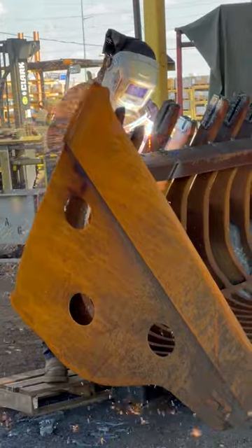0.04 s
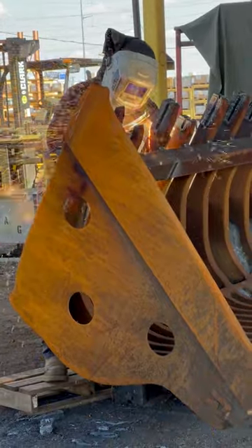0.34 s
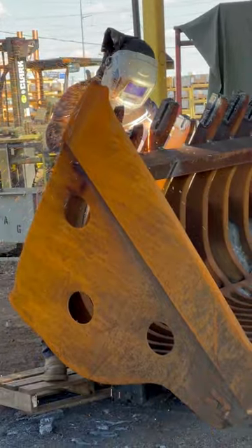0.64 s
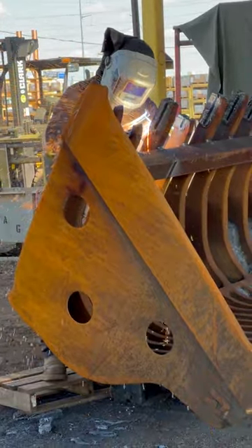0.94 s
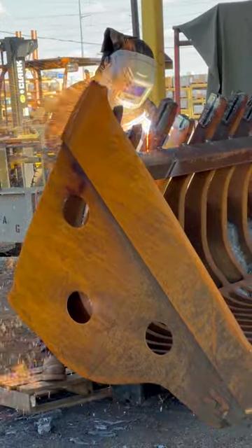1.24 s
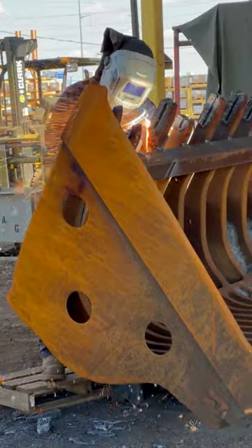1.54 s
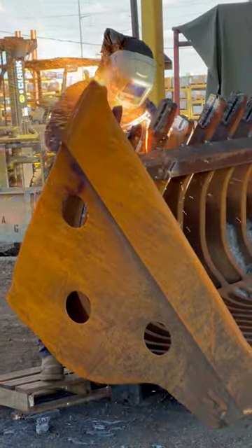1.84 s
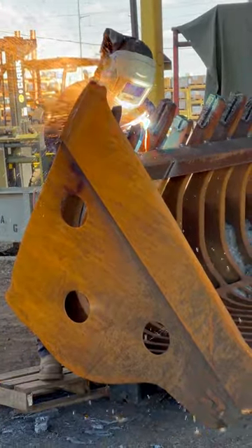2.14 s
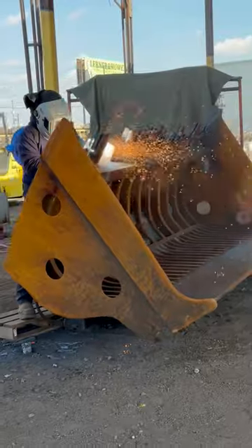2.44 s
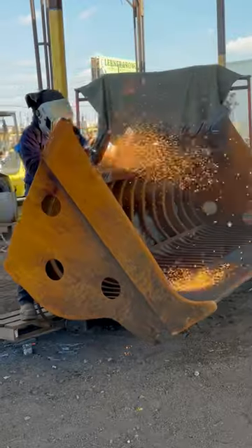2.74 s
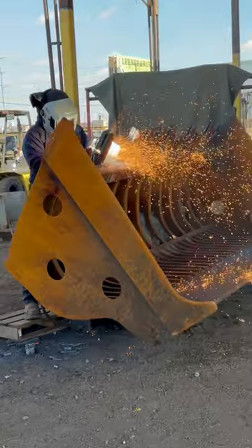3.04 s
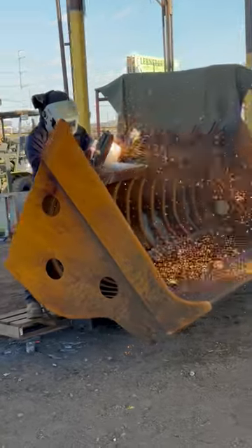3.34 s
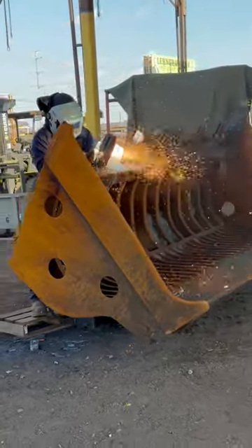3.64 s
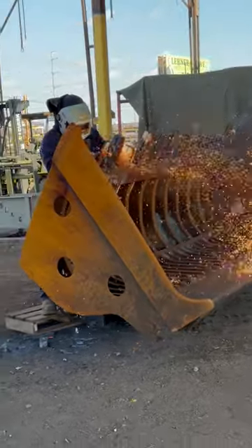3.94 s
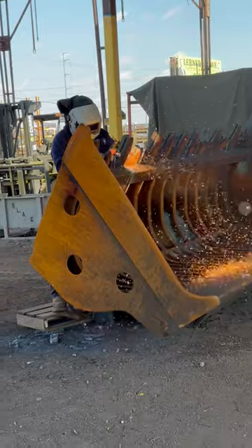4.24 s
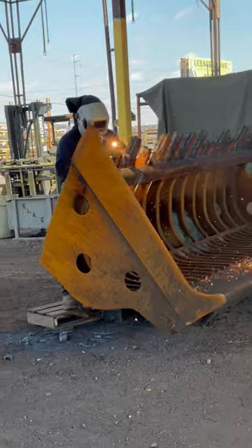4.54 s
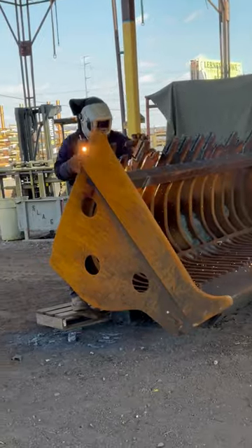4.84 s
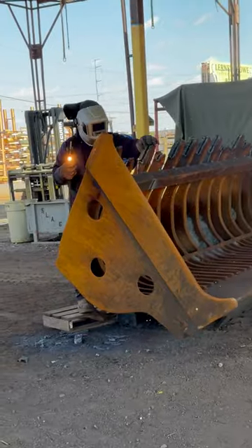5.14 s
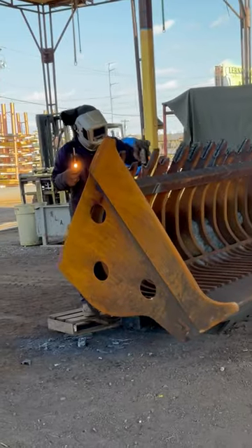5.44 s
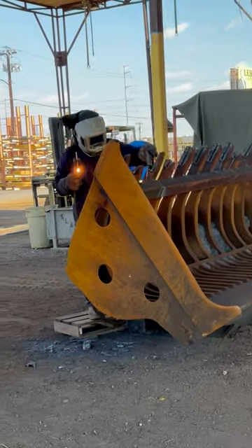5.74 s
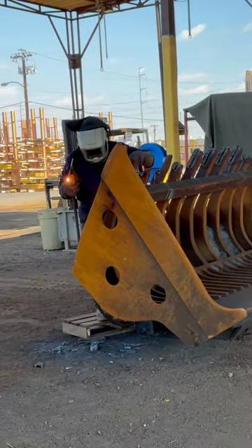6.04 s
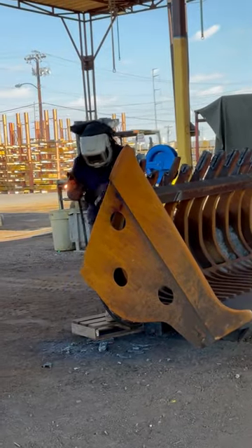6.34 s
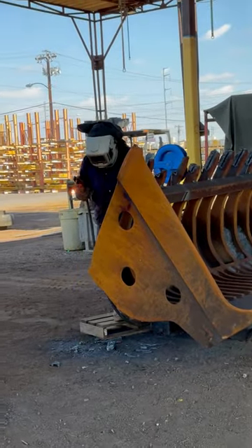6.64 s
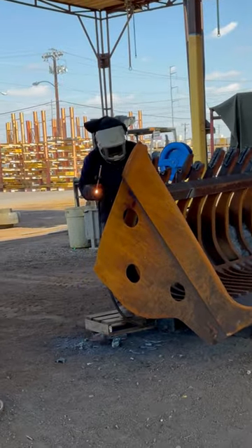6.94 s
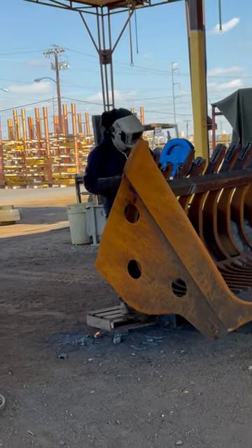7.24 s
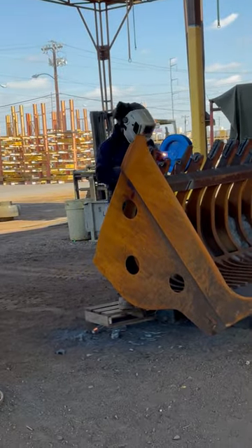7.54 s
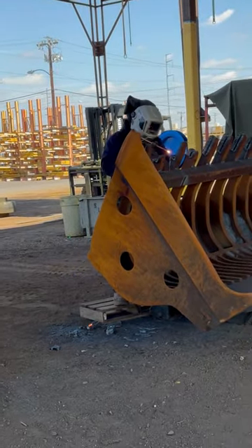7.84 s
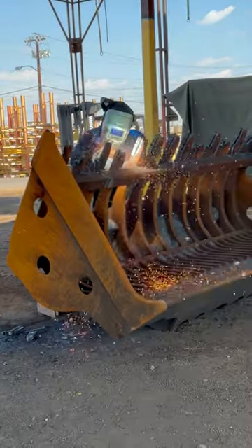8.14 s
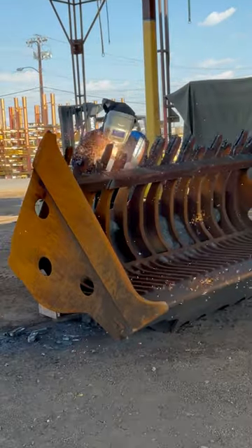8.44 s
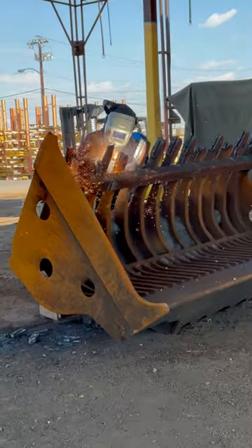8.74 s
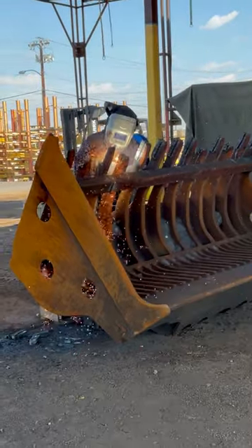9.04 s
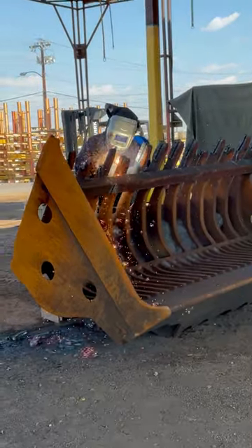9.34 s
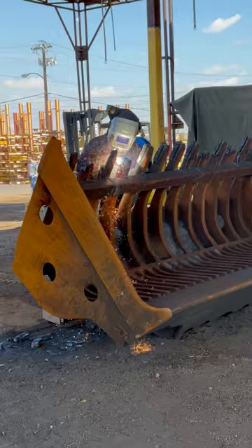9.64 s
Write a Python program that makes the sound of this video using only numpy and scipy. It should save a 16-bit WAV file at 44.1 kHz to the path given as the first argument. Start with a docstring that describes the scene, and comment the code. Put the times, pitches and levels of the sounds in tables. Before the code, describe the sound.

Stop-and-go sizzling and cracking of an arc torch on a steel bucket, a pause of hissing air, then a steadier burn.

```python
"""Air-arc gouging on a steel excavator bucket, a few metres off, under an open workshop roof.
The arc roars, sizzles and cracks, ringing the bucket's hollows and ribs; compressed air blows the melt
out in puffs. The arc sputters out near 4 s, the jet hisses and rushes over the steel while the torch
is moved, and the arc strikes again at 8 s. An engine drones in the yard."""
import sys
import numpy as np
from scipy import signal
from scipy.fft import rfft, irfft, next_fast_len
from scipy.io import wavfile
from scipy.ndimage import uniform_filter1d, map_coordinates

SR = 44100
rng = np.random.default_rng(int(sys.argv[2]) if len(sys.argv) > 2 else 0)


def store_pcm(level_fs):
    """Save levels as 16-bit WAV."""
    pcm = np.round(np.clip(level_fs, -1, 1) * 32767).astype(np.int16)
    wavfile.write(sys.argv[1], SR, np.atleast_2d(pcm).T)


N = 427769
TIME_S = np.arange(N) / SR
CHANGE_S, RESTRIKE_S = 2.33, 8.0  # sound abruptly changes colour and widens; last pass starts

# Stop-and-go burns: t/s, length/s, relative roar/dB, swell/dB, gurgle/dB re roar, sizzle/dB re roar
ARC_BURNS = [(-0.021, 0.22, -23, 1, -9.5, -5.0), (0.221, 0.069, -24.5, 3, -9, -3.5),
             (0.312, 0.027, -25, 2, -7, -1), (0.446, 0.2, -26.5, -3, -13, -2.5),
             (0.672, 0.13, -36, -6, -15.5, 1), (0.842, 0.079, -31, -4, -13, -1.5),
             (0.917, 0.29, -23, 0, -12.5, -5), (1.228, 0.065, -25.0, 2, -7, -2.0),
             (1.328, 0.18, -26, -1.5, -7.5, 0.5), (1.583, 0.05, -31, 0.5, -5.5, 2),
             (1.659, 0.36, -45.5, -0.5, -19, 14), (2.043, 0.08, -39, 4.5, -5, 9.5),
             (2.112, 0.2, -28.0, 2, -6.5, 0.5), (2.3, 0.31, -23, 2.5, -11.5, -2),
             (2.674, 0.054, -27, 4, -10.5, 0), (2.824, 0.069, -29, 9.5, -18, -2.0),
             (2.944, 0.14, -26.5, 6.5, -12, -3.5), (3.076, 0.2, -22, 1, -11.5, -6),
             (3.344, 0.21, -23.5, 2.5, -15.5, -3), (3.566, 0.13, -28.5, -0.5, -11, -4.5),
             (3.781, 0.032, -29, 3.5, -8.5, -7), (3.994, 0.028, -31.5, 1, -5, -2)]
# Hot groove between burns, relative: gurgle/dB, roar/dB, sizzle/dB
GROOVE_SMOULDER = (-47.5, -38, -42.5)
# Unbroken last burn, relative: t/s, gurgle/dB, roar/dB, sizzle/dB
LAST_BURN = [(8.02, -33.5, -26, -28.5), (8.15, -32.5, -26, -29), (8.254, -29.5, -20, -27),
             (8.348, -31.5, -25.5, -28.5), (8.488, -31, -20, -24.5), (8.64, -33.5, -21.5, -26),
             (8.735, -35, -20, -24), (8.844, -37, -23.5, -26), (8.886, -37, -25, -28),
             (8.922, -34, -24, -26), (9.002, -39.5, -27.5, -28), (9.038, -36, -22, -26.5),
             (9.2, -43, -33.5, -30), (9.3, -41, -31, -29.5), (9.38, -40, -27, -28), (9.59, -40.5, -26, -29),
             (9.64, -41.5, -26, -26.5)]
# Arc unsteadiness: t/s, crackle/dB re smooth roar
ARC_SPUTTER = [(0, -19), (2.2, -4.5), (2.75, 1.5), (3.1, -12.5), (3.55, 0.5), (4.1, -19), (8.5, -9),
               (9.2, -14)]
# Arc spectrum per stretch (before CHANGE_S, until the arc goes out, last burn): f/Hz, relative density/dB
STRETCH_1_SPECTRUM = [(80, -25), (150, -12.5), (200, -11.5), (400, -7.5), (520, -5), (750, -10.5), (1400, -4),
                      (2000, -2.5), (3200, -2), (3700, -2.5), (7000, 2), (9000, -3), (11000, -20),
                      (15500, -11)]
STRETCH_2_SPECTRUM = [(80, -27), (150, -3.5), (220, -13.5), (320, -8), (470, -2), (620, -10), (900, -4.5),
                      (1500, -1.5), (2700, -0.5), (5800, -1), (6600, 2.5), (9000, -4), (12500, -27),
                      (15500, -14.5)]
STRETCH_3_SPECTRUM = [(50, -33), (140, -2.5), (220, -11), (400, -3), (650, -8), (1200, -1.5), (1700, -1),
                      (2200, 1.5), (4000, -1), (7000, -1.5), (9000, -3.5), (11000, -22), (12500, -18),
                      (15500, -15)]
# Hollows between lip, teeth and ribs, per stretch: f/Hz, width/Hz, nominal boost/dB
STRETCH_1_HOLLOWS = [(495, 94, 3), (960, 46, 3.5), (1410, 170, 5), (1600, 42, 2), (1960, 64, 5.5),
                     (2540, 60, 5.5), (2796, 75, 5), (3060, 280, 4), (4520, 120, -3), (5360, 340, 3)]
STRETCH_2_HOLLOWS = [(363, 40, 2), (725, 130, 3.9), (1100, 65, 2.8), (1433, 82, 3.3), (1560, 150, 3.2),
                     (2210, 190, 1.4), (2360, 59, 1.9), (2460, 28, 3.2), (2750, 95, 3.8), (3260, 63, 1.5)]
STRETCH_3_HOLLOWS = [(786, 25, 8.3), (1168, 114, 8.9), (1370, 92, 3.5), (1644, 250, 6.8), (1750, 82, 1.9),
                     (2090, 19, 3.5), (2490, 81, 4.6), (2720, 100, 7.6), (3540, 340, 3.4), (4200, 79, 2.5),
                     (5100, 230, 2.9)]
# Torch depth in the hollows: t/s, factor on boost
HOLLOW_DEPTH = [(4.3, 1), (8.05, 1.35), (8.45, 0.99), (8.8, 1.05), (9.3, 0.72)]
# Bursting droplets: f/Hz, relative density/dB
SPATTER_SPECTRUM = [(4000, -38), (7000, -18), (8600, 7.5), (11000, 8.5), (12500, 6), (15500, -17)]
# Arc cracks: t/s, relative level/dB
ARC_CRACKS = [(0.9834, -7), (1.092, -10), (1.2973, -9), (2.3672, -10), (2.579, -7), (2.7189, -10),
              (2.732, -12), (2.885, -7), (3.088, -6), (3.474, -4), (3.498, -9), (3.512, -17), (3.523, -11),
              (3.533, -8), (3.543, -12), (3.561, -3), (3.566, -2), (3.689, -1), (3.692, -3), (3.8008, -5),
              (3.809, -11), (3.814, -9), (4.0189, -4), (4.0203, -5), (4.0228, -6.5), (4.0363, -11),
              (4.041, -12), (4.052, -14), (4.056, -17)]
# Resonances among the ribs: f/Hz, width/Hz, relative level/dB
RIB_MODES = [(1486, 39, -3), (1880, 95, -10), (2450, 52, -5), (3260, 36, -6), (3490, 57, -1),
             (4180, 31, -2), (4350, 51, -16), (5420, 51, -9), (5820, 31, -11), (6700, 39, -15),
             (6650, 64, -11)]
# Melt blown from the groove: t/s, relative level/dB, Gaussian sigma/s, f/Hz
MELT_PUFFS = [(0.108, -36, 0.014, 520), (.195, -33, .009, 510), (0.289, -32, 0.0072, 503),
              (0.353, -34, 0.011, 880), (0.57, -34, 0.015, 523), (0.649, -36.5, .015, 554),
              (.89, -37, 0.013, 520), (.96, -36.5, 0.013, 510), (1.019, -33, .01, 520),
              (1.199, -35.5, 0.0067, 474), (1.269, -34, .008, 400), (1.298, -30, 0.0082, 523),
              (1.415, -34, 0.0091, 550), (1.458, -33, 0.011, 477), (1.634, -33, 0.0078, 905),
              (2.016, -41, 0.0069, 520), (2.611, -33, .006, 380), (2.742, -30.5, 0.0079, 444),
              (2.903, -34, 0.011, 443), (3.477, -30.5, .005, 450), (3.512, -29.5, .004, 400),
              (3.53, -32, .004, 340), (3.816, -34, 0.007, 455), (4.025, -29.5, 0.003, 350),
              (4.038, -31, 0.0027, 1400), (4.05, -40, .005, 300)]

# Jet, louder as the nozzle faces the listener: t/s, hiss/dB, fizz/dB
NOZZLE_LEVELS = [(4.2, -44, -38), (4.44, -41.5, -35.5), (4.62, -42.5, -43), (4.9, -41.5, -38.5),
                 (5.0, -38.5, -35), (5.7, -37.5, -35), (6.1, -40, -35.5), (6.74, -40, -37),
                 (7.06, -38.5, -34.5), (7.3, -43, -43), (7.6, -42.5, -38), (7.98, -42, -34.5),
                 (9.3, -43, -53)]
# Jet fizz, free hiss, rush on steel, pocket between the teeth: f/Hz, relative density/dB
FIZZ_SPECTRUM = [(4000, -43), (6500, -4), (7600, -9.5), (8700, 6), (9300, 5), (10800, 8), (12000, 1),
                 (13000, -1.5), (14500, 2), (15500, 2.5)]
HISS_SPECTRUM = [(300, -20), (1200, -15), (2400, -9.5), (3200, -4.5), (5400, -3), (6650, 2), (7400, 1.5),
                 (8250, -8), (8600, -36), (9500, -53), (15000, -26)]
RUSH_SPECTRUM = [(100, -10), (240, -3.5), (400, 0.5), (640, 2), (810, -2), (930, 4.5), (1150, -0.5),
                 (1450, 2), (1650, 1), (2000, 1.5), (3000, 0), (6000, -17), (12000, -35)]
POCKET_SPECTRUM = [(150, -12), (340, -4), (570, 1), (720, -3.5), (830, 2), (950, -8), (1220, 0),
                   (1500, -0.5), (1740, 2.5), (2100, -4), (3000, -3), (6000, -20), (12000, -35)]
# Jet echo off the side plate: t/s, delay/ms, gain
SIDE_ECHO = [(4.1, 1, 0.15), (5.3, 1.8, 0.11), (5.9, 2.03, 0.45), (6.4, 1.75, 0.42), (7, 1.77, 0.62),
             (7.25, 1.8, .15), (8, 1, 0.11)]
# Jet drifting off the steel, then back into the pocket: t/s, relative level/dB
RUSH_LEVEL = [(4.15, -43), (4.42, -48), (4.78, -44), (5.32, -60.5), (6.13, -52.5), (6.68, -60)]
POCKET_LEVEL = [(6.712, -40.5), (6.8, -40), (6.85, -42), (7.0, -42.5), (7.22, -52), (7.38, -46),
                (7.582, -50.5), (7.786, -64), (7.98, -49)]
# Pocket resonance: start f/Hz, end f/Hz, time constant/s, width/Hz
POCKET_GLIDE = (1400, 860, 0.11, 560)
# Brief whistle in the hiss: t/s, level/dB, signed Gaussian sigma/s, f/Hz, width/Hz
HISS_WHISTLE = (6.975, -47.5, -0.1, 6270, 130)

# Echoes inside the bucket: delay/ms, gain
PLATE_ECHOES = [(.8, -0.074), (2.1, 0.038), (2.8, -0.0002), (3.85, 0.13), (5.6, 0.15), (7.3, 0.21),
                (11, 0.15), (16, 0.12), (23, 0.28)]
# Roof decay: f/Hz, T60/s
ROOF_T60 = [(200, 0.11), (2000, 0.58), (10000, 0.032)]
# Engine and yard: t/s, relative level/dB
ENGINE_LEVEL = [(0.0, -47), (0.08, -45.5), (1.73, -48.5), (2.27, -51.5), (2.32, -42), (4.27, -45.5),
                (7.73, -42.5), (8.24, -37), (9.4, -44), (9.7, -43)]
# Engine tones: f/Hz, relative level/dB
ENGINE_TONES = [(60, 1.5), (90, -7), (120, -7.5), (156, -8.5)]
# Yard rumble: f/Hz, relative density/dB
YARD_SPECTRUM = [(20, -30), (35, -9), (46, 1), (60, -3), (80, 2), (150, -8), (220, -8.5), (500, -21),
                 (2000, -17.5), (10000, -28)]
# Stereo width: f/Hz, side gain/dB
SIDE_GAIN = [(40, -30), (70, -39), (150, -19), (300, -14.5), (600, -7.5), (1000, -8.5), (1500, -12),
             (2100, -60), (3500, -59), (5700, -20), (7200, -38), (8400, -82), (9100, -2), (15000, -1)]
# Balance: f/Hz, left minus right/dB
BALANCE = [(350, 0), (580, 1.6), (850, .4), (1150, 1.4), (1600, 0)]
# Phase twist, channels opposed near 5 kHz, after CHANGE_S near 8 kHz: f/Hz, left minus right/rad
PHASE_EARLY = [(4500, 0), (4880, -1), (5030, -5.2), (5250, -6.28), (6300, -6.28), (7600, -7.1),
               (10000, -6.28)]
PHASE_LATE = [(2200, 0), (2800, .62), (4000, .7), (5000, .4), (5300, 0), (6300, 0), (7000, .7), (7500, 1.6),
              (7950, 3.05), (8450, 3.25), (8850, 5.9), (9500, 6.28)]


def arc(flutter_db=1.0):
    """Turbulent hot air plus crackling discharges, fluttering with the gap; heard in three stretches, the first
    two parted by an abrupt change of colour at CHANGE_S."""
    crackle = amp(curves(ARC_SPUTTER)[0])
    flow = (noise() + crackle * sparks(rate_hz=1100, spread_db=2)) / np.hypot(1, crackle)
    flow = bucket(flow * amp(flutter_db * wobble(45)))
    broken, unbroken = burns(), amp(curves(LAST_BURN))
    first = gouge(flow, broken, STRETCH_1_SPECTRUM, STRETCH_1_HOLLOWS, start_s=-0.01,
                  stop_s=CHANGE_S + 0.0037, fade_s=0.0078, trims_db=(-2.8, -0.2, 1), side_db=-4)
    second = gouge(flow, broken, STRETCH_2_SPECTRUM, STRETCH_2_HOLLOWS, start_s=CHANGE_S,
                   stop_s=4.36, fade_s=0.15, trims_db=(-0.3, -0.1, 1.4), side_db=2)
    third = gouge(flow, unbroken, STRETCH_3_SPECTRUM, STRETCH_3_HOLLOWS, start_s=RESTRIKE_S,
                  stop_s=9.8, fade_s=0.01, trims_db=(0.4, -0.1, 1.6), side_db=3)
    sizzle = np.where(TIME_S < RESTRIKE_S, broken[2], unbroken[2])
    return first + second + third + spatter(sizzle)


def burns(catch_s=0.032, die_db_per_s=224, lift_s=3.81, cool_db_per_s=13.5):
    """Gurgle, roar, sizzle gains: burns catch, swell and die to a smoulder that cools on torch lift."""
    cooling_db = cool_db_per_s * np.maximum(TIME_S - lift_s, 0)
    power = amp(np.array(GROOVE_SMOULDER)[:, None] - cooling_db) ** 2
    for start_s, length_s, roar_db, swell_db, gurgle_db, sizzle_db in ARC_BURNS:
        span = (TIME_S > start_s) & (TIME_S < start_s + length_s + 0.5)
        age_s = TIME_S[span] - start_s
        attack = np.minimum(age_s / catch_s, 1)
        level_db = roar_db + swell_db * (np.minimum(age_s / length_s, 1) - 0.5)
        level_db -= die_db_per_s * np.maximum(age_s - length_s, 0)
        power[:, span] += (attack * amp(level_db) * amp([[gurgle_db], [0], [sizzle_db]])) ** 2
    return np.sqrt(power)


def gouge(flow, gains, spectrum, modes, start_s, stop_s, fade_s, trims_db, side_db):
    """One stretch of gouging: gurgle in the melt (low), roar along the groove (mid), sizzle at the electrode
    (high)."""
    def crossover(hz, low_hz=850, high_hz=4200):
        low, low_mid = (1 / (1 + (hz / edge_hz) ** 8) for edge_hz in (low_hz, high_hz))
        return (amp(along(spectrum, hz)) * np.array([low, low_mid - low, 1 - low_mid]))[:, None]

    bands = filtered(hollows(flow, modes), crossover)
    sound = sum(gain * amp(db) * unit(band) for gain, db, band in zip(gains, trims_db, bands))
    gate = ramp(start_s, 0.0029) * np.clip((stop_s - TIME_S) / fade_s, 0, 1)
    return gate * sound * amp([[0], [side_db]])


def sparks(rate_hz, spread_db):
    """Tiny discharges, random in time and size; rms 1."""
    fires = rng.random((2, N)) < rate_hz / SR
    return unit(fires * amp(spread_db * np.clip(noise(), -2, 2)))


def bucket(flow, drift=0.01944):
    """Near echoes off the plates, shifting as the torch travels."""
    echoes = sum(gain * delayed(flow, ms * (1 + drift * wobble(1.2))) for ms, gain in PLATE_ECHOES)
    return unit(flow + echoes)


def hollows(flow, modes, swing=0.35, drift=0.014, smooth_frames=11):
    """Cavity resonances swing in strength and drift in pitch as the jet passes."""
    def wander():
        steps = rng.standard_normal(len(frames_s))
        return unit(uniform_filter1d(uniform_filter1d(steps, smooth_frames), smooth_frames))

    hz, frames_s, spectra = signal.stft(flow, SR, nperseg=2048)
    depth = np.interp(frames_s, *np.transpose(HOLLOW_DEPTH))
    boost_db = 0
    for centre_hz, width_hz, db in modes:
        strength = np.clip(1 + swing * wander(), 0, 1.7)
        pitch_hz = centre_hz * (1 + drift * wander())
        boost_db += db * strength * peak(hz[:, None] - pitch_hz, width_hz)
    return signal.istft(spectra * amp(depth * boost_db), nperseg=2048)[1][:, :N]


def spatter(sizzle, gain_db=-12, decay_s=0.0099):
    """Flying steel droplets burst in bright spits, scaled by the sizzle."""
    onsets = sparks(rate_hz=260, spread_db=8.5)[0]
    bursts = signal.lfilter([1], [1, -np.exp(-1 / (decay_s * SR))], onsets)
    return amp(gain_db) * sizzle * coloured(bursts * noise(), SPATTER_SPECTRUM)


def cracks(shock_s=0.00021, rattle_s=0.0032, rattle_db=-19, trim_db=-4, ring_db=15):
    """The arc breaks with a pressure step that rattles among the steel ribs and rings them."""
    def ribs(hz):
        ring = sum(amp(db + ring_db) * 1j * hz * width_hz / (mode_hz ** 2 - hz ** 2 + 1j * hz * width_hz)
                   for mode_hz, width_hz, db in RIB_MODES)
        tone_db = along([(80, -17), (350, 3.5), (800, 0.5), (3000, -1), (7000, 7.5), (15000, -3)], hz)
        return (1 + ring) * amp(tone_db)

    age_s = np.arange(SR // 10) / SR
    shock = (1 - 2 * age_s / shock_s) * np.exp(-2 * age_s / shock_s)
    out = np.zeros((2, N + SR))
    for start_s, db in ARC_CRACKS:
        rattle = amp(rattle_db) * np.exp(-age_s / rattle_s) * noise(len(age_s))
        out[:, round(start_s * SR):][:, :len(age_s)] += amp(db + trim_db) * (rattle - shock)
    return filtered(out[:, :N], ribs)


def puffs(q=5.7, broadband_db=-13):
    """Each gob of melt leaves with a throaty puff, pitched by the hollow it is blown into."""
    offset_s = np.arange(-SR // 10, SR // 10) / SR
    out = np.zeros((2, N + SR))
    for centre_s, db, sigma_s, hz in MELT_PUFFS:
        swell = np.exp(-0.5 * (offset_s / sigma_s) ** 2)
        gust = swell * noise(len(swell))
        throat = unit(signal.lfilter(*signal.iirpeak(hz, q, SR), gust))
        puff = throat + amp(broadband_db) * unit(gust)
        start = max(round((centre_s + offset_s[0]) * SR), 0)
        out[:, start:start + len(swell)] += amp(db) * np.sqrt(np.mean(swell ** 2)) * puff
    return equalised(out[:, :N], [(2000, 0), (7000, -25)])


def air(arc_out_s=4.05):
    """The jet fizzes throughout; with the arc out it also hisses freely and rushes on the steel."""
    hiss_db, fizz_db = curves(NOZZLE_LEVELS)
    echo_ms, echo_gain = curves(SIDE_ECHO)
    rush = amp(curves(RUSH_LEVEL)[0] + 1) * coloured(noise(), RUSH_SPECTRUM)
    on_steel = rush + pocket()
    free = coloured(noise(), HISS_SPECTRUM)
    hiss = amp(hiss_db + 0.53 * wobble(29)) * unit(free + echo_gain * delayed(free, echo_ms))
    flutter_db = 0.7 * (wobble(43) + wobble(12))
    fizz = amp(fizz_db + flutter_db) * coloured(noise(), FIZZ_SPECTRUM)
    arc_out = ramp(arc_out_s, 0.27) * (TIME_S < RESTRIKE_S + 0.005)
    return arc_out * (amp(0.5 * wobble(12)) * on_steel + hiss) + fizz


def pocket(hoot_share=0.3, trim_db=0.5, rise_s=0.0066):
    """Swinging back, the jet catches between the teeth and turns hollow."""
    start_s = POCKET_LEVEL[0][0]
    rush = np.sqrt(1 - hoot_share) * coloured(noise(), POCKET_SPECTRUM)
    gain = ramp(start_s, rise_s) * amp(curves(POCKET_LEVEL)[0] + trim_db)
    return gain * (rush + np.sqrt(hoot_share) * hoot(start_s))


def hoot(start_s):
    """The pocket's resonance, a noise band, sinks as the jet goes deeper; rms 1."""
    start_hz, end_hz, glide_s, width_hz = POCKET_GLIDE
    pitch_hz = end_hz + (start_hz - end_hz) * np.exp(-np.maximum(TIME_S - start_s, 0) / glide_s)
    phase = 2 * np.pi * np.cumsum(pitch_hz) / SR
    return unit(noise_band(0, width_hz) * np.cos(phase) + noise_band(0, width_hz) * np.sin(phase))


def whistle():
    """A brief airy whistle: a narrow band of the hiss swells near 6.3 kHz."""
    centre_s, db, sigma_s, pitch_hz, width_hz = HISS_WHISTLE
    swell = np.exp(-0.5 * ((TIME_S - centre_s) / sigma_s) ** 2)
    return amp(db) * swell * unit(noise_band(pitch_hz, width_hz))


def roof(x):
    """Short roof reverberation; treble dies first."""
    hz, age_s, spectra = signal.stft(noise(SR // 2), SR, nperseg=256)
    decay = amp(-60 * age_s / along(ROOF_T60, hz)[:, None])
    tail = signal.istft(spectra * decay, SR, nperseg=256)[1]
    return signal.fftconvolve(x, tail / np.linalg.norm(tail[0]), axes=1)[:, :N]


def engine(drone_db=-1.5, rumble_db=-2, waver_db=1.3):
    """Distant engine: a slightly unsteady, centred drone over the yard's rumble."""
    clock_s = TIME_S + 0.0009 * wobble(3.7)
    drone = sum(amp(db + 1.35 * wobble(5.9)) * np.sin(2 * np.pi * (hz * clock_s + rng.random()))
                for hz, db in ENGINE_TONES)
    gain = amp(curves(ENGINE_LEVEL)[0] + waver_db * wobble(9))
    rumble = amp(rumble_db) * coloured(noise(), YARD_SPECTRUM)
    return gain * (amp(drone_db) * unit(drone) * [[1], [0]] + rumble)


def stereo(mid, side):
    """Mid/side to left/right, skewed in level and phase; the phase twist switches at CHANGE_S."""
    split = np.array([[0.5], [-0.5]])
    pair = filtered(np.array([mid + side, mid - side]), lambda hz: amp(split * along(BALANCE, hz)))
    early = filtered(pair, lambda hz: np.exp(1j * split * along(PHASE_EARLY, hz)))
    late = filtered(pair, lambda hz: np.exp(1j * split * along(PHASE_LATE, hz)))
    blend = ramp(CHANGE_S, 0.0075)
    return (1 - blend) * early + blend * late


def amp(db):
    """dB to gain."""
    return 10 ** (np.asarray(db) / 20)


def unit(x):
    """Scale to rms 1."""
    return x / np.sqrt(np.mean(x ** 2) + 1e-20)


def along(points, hz):
    """Interpolate (f/Hz, value) points on a log axis."""
    knots_hz, values = np.transpose(points)
    return np.interp(np.log(hz + 1), np.log(knots_hz + 1), values)


def curves(rows):
    """Per-sample curve for each column after t/s."""
    knots_s, *columns = np.transpose(rows)
    return [np.interp(TIME_S, knots_s, column) for column in columns]


def ramp(start_s, rise_s):
    """Linear rise, 0 to 1."""
    return np.clip((TIME_S - start_s) / rise_s, 0, 1)


def wobble(rate_hz):
    """Smooth random curve, rate_hz knots a second."""
    return map_coordinates(rng.standard_normal(int(N * rate_hz / SR) + 4), [TIME_S * rate_hz])


def peak(offset_hz, width_hz):
    """Resonance bell, height 1."""
    return 1 / (1 + (2 * offset_hz / width_hz) ** 2)


def noise(samples=N):
    """White mid/side noise."""
    return rng.standard_normal((2, samples))


def noise_band(centre_hz, width_hz):
    """Bell-filtered mid/side noise."""
    return filtered(noise(), lambda hz: peak(hz - centre_hz, width_hz))


def filtered(x, response):
    """Apply response(hz) by FFT."""
    size = next_fast_len(N + 8192, True)
    return irfft(rfft(x, size) * response(np.fft.rfftfreq(size, 1 / SR)), size)[..., :N]


def equalised(x, points):
    """Apply (f/Hz, gain/dB) points."""
    return filtered(x, lambda hz: amp(along(points, hz)))


def coloured(x, spectrum):
    """Equalise, then scale to rms 1."""
    return unit(equalised(x, spectrum))


def delayed(x, delay_ms):
    """Moving delay on a mid/side pair."""
    return np.array([np.interp(TIME_S - delay_ms / 1000, TIME_S, row) for row in x])


def scene(roof_db=-15):
    """All sources straight ahead: narrow bass, wide top treble."""
    torch = arc() + puffs() + cracks()
    mid, side = torch + amp(roof_db) * roof(torch) + air() + whistle() + engine()
    return stereo(mid, equalised(side, SIDE_GAIN))


def record(dry, ceiling=0.6, top_hz=15850):
    """Round off the tallest spikes; cut everything above top_hz."""
    rounded = dry / (1 + np.abs(dry / ceiling) ** 6) ** (1 / 6)
    return filtered(rounded, lambda hz: hz < top_hz)


dry = scene()
out = record(dry)
store_pcm(out)
```